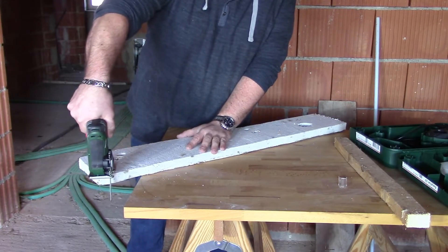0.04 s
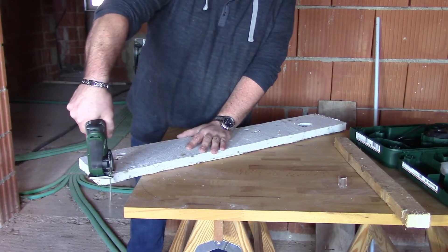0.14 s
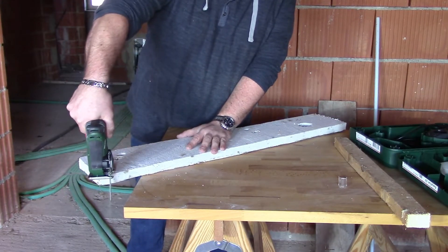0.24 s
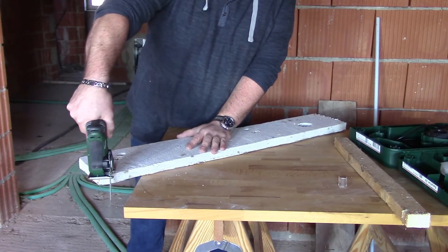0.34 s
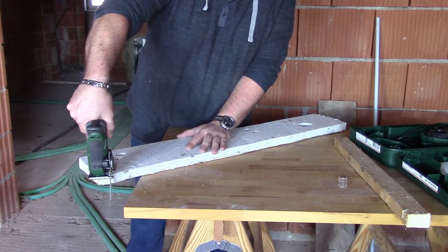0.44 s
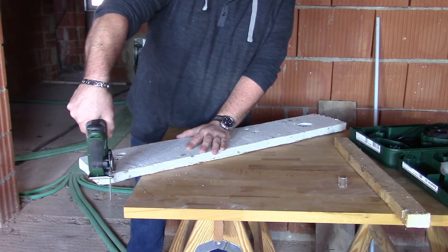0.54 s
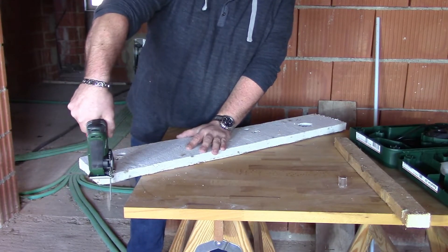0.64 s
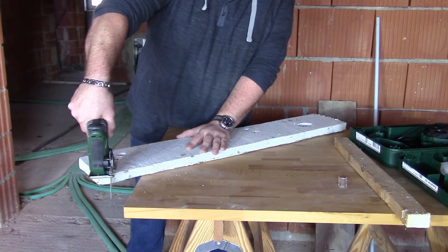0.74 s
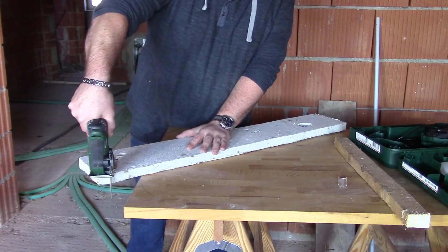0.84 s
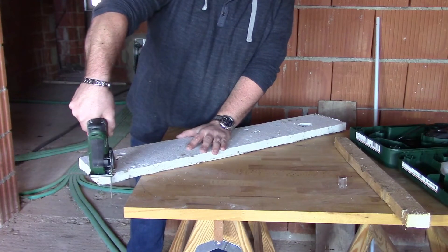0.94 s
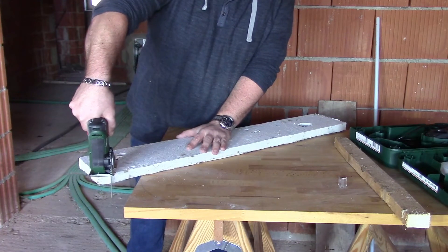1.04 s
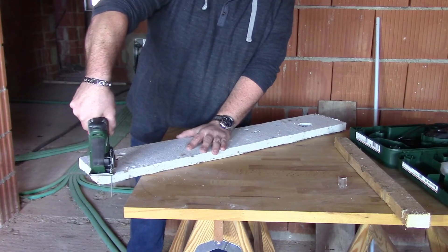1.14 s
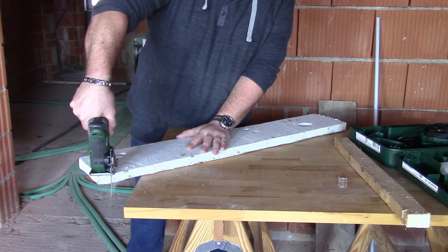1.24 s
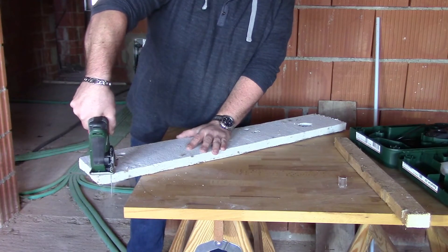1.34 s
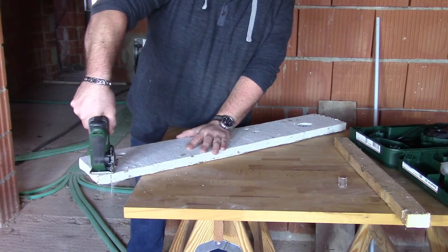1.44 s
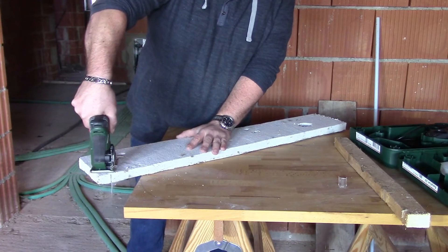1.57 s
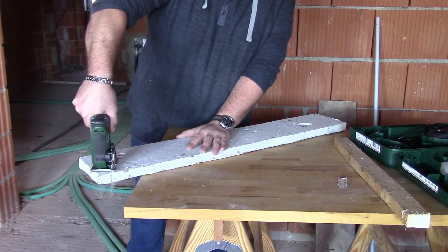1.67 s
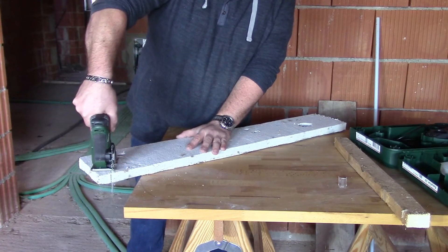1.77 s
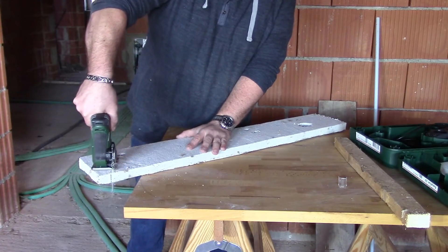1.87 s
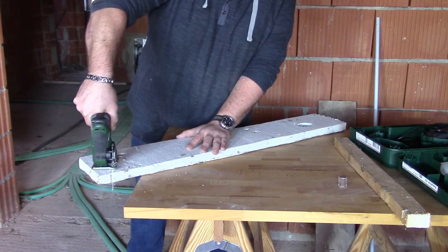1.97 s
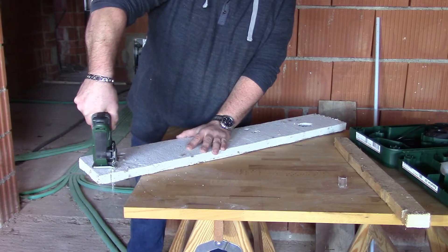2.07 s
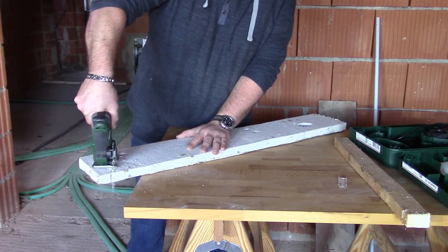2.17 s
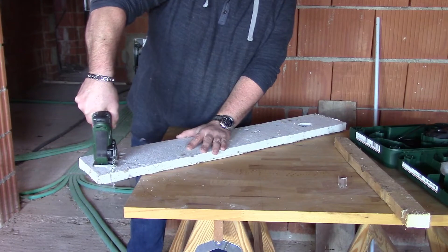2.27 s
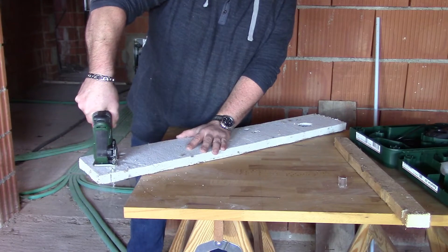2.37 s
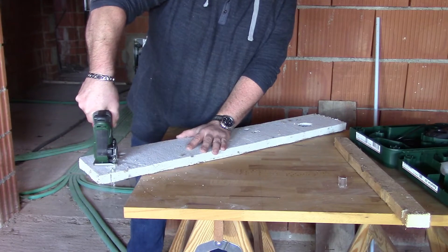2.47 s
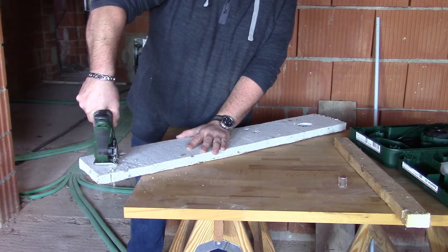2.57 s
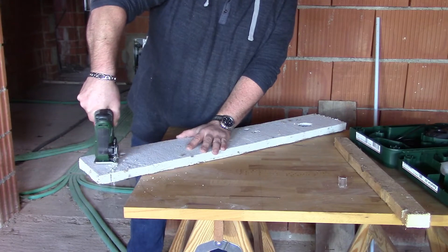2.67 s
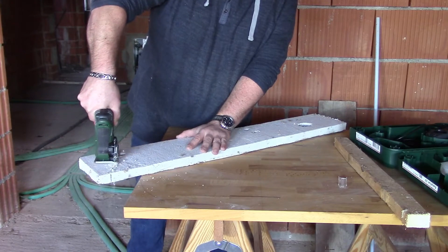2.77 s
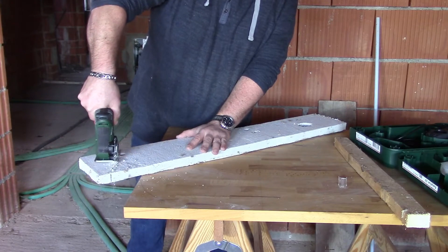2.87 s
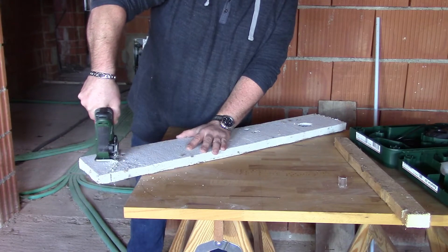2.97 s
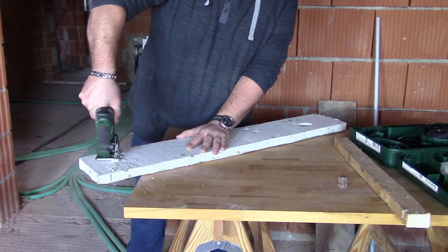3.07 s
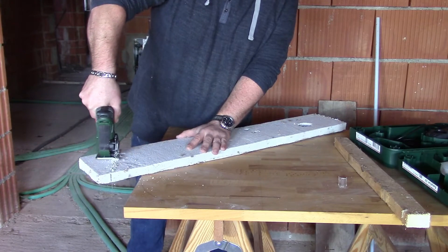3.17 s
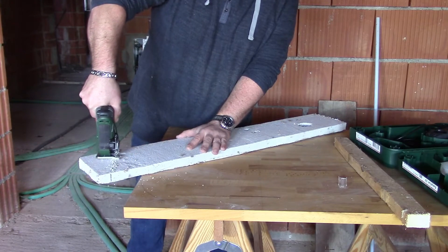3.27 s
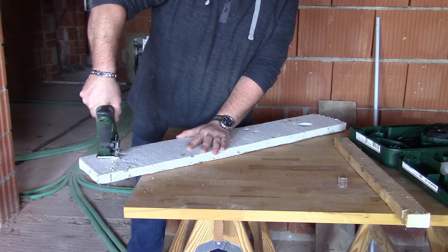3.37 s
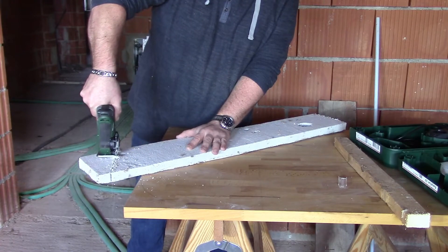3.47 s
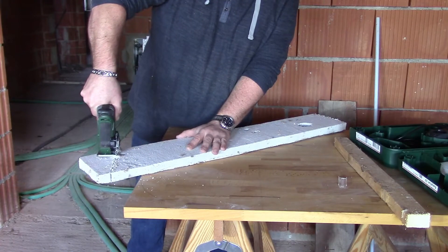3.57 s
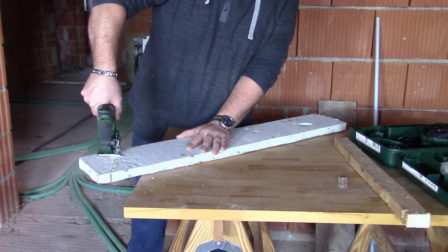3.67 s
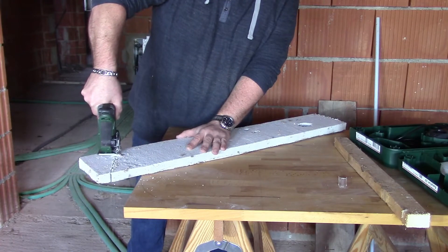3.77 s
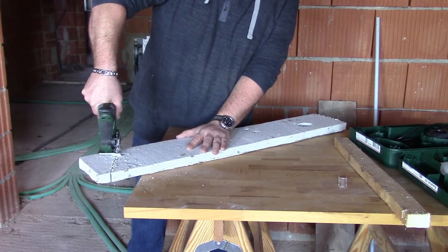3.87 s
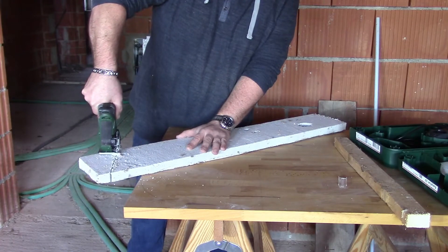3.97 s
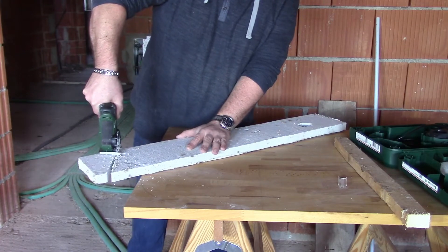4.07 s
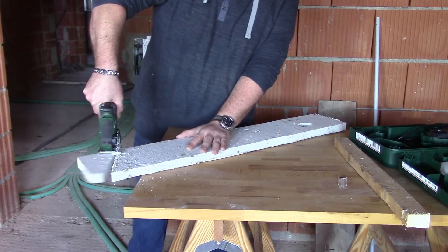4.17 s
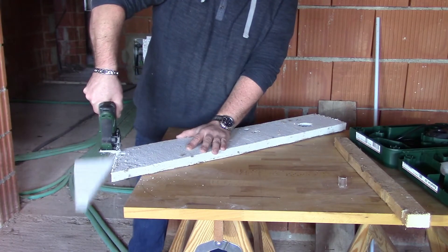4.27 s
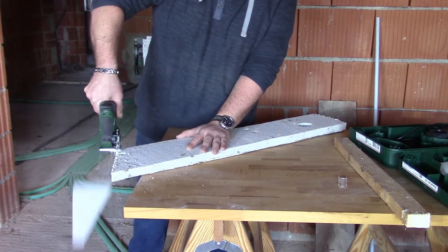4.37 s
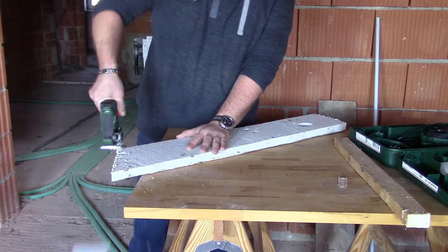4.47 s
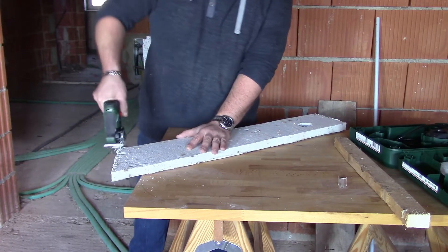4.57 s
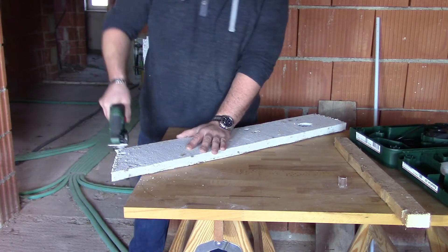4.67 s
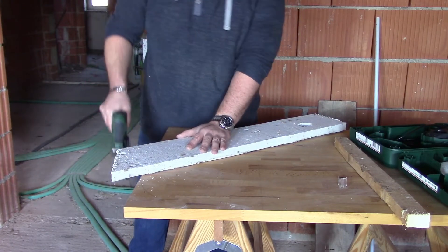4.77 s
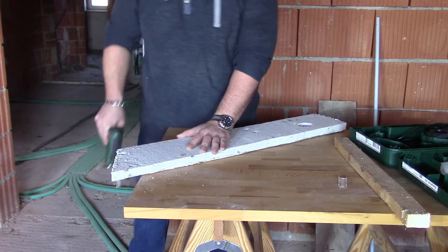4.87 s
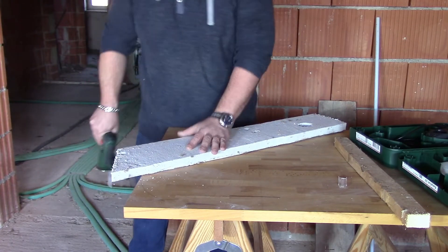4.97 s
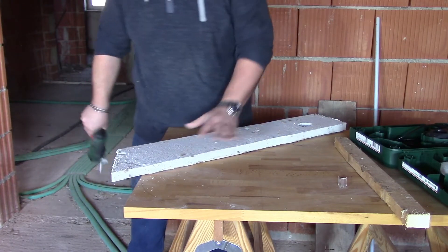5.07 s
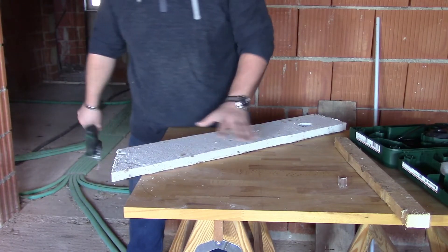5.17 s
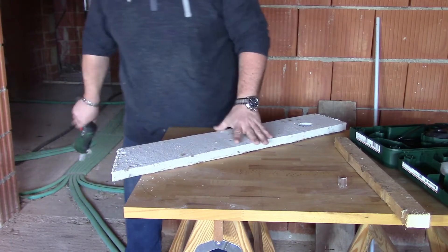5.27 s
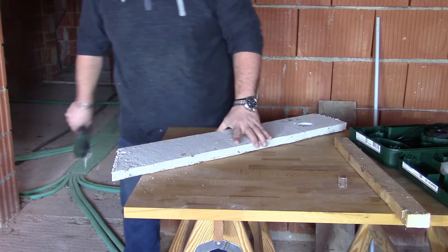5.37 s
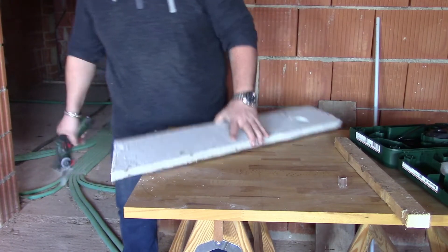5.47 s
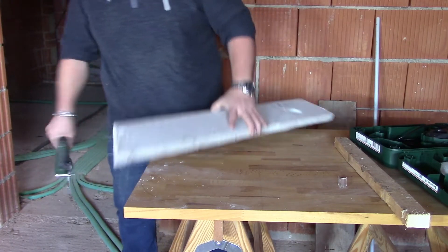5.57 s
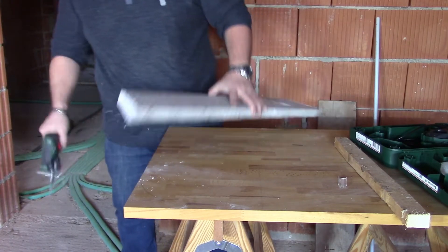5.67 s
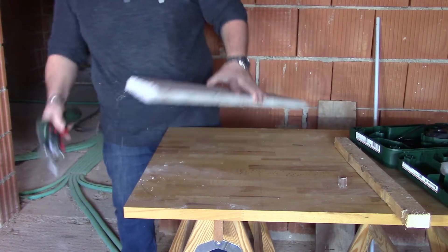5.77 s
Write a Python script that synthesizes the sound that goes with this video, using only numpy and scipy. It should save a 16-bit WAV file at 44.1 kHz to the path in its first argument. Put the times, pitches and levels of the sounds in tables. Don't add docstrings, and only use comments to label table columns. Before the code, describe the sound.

Harsh, buzzing chain saw cutting of light foam for about four seconds, then a quick stop, a hollow bouncing drop, short scuffs and dry clicks.

```python
import sys
import numpy as np
from scipy import signal
from scipy.fft import rfft, irfft
from scipy.io import wavfile
from scipy.ndimage import uniform_filter1d, minimum_filter1d

SR = 44100
rng = np.random.default_rng(int(sys.argv[2]) if len(sys.argv) > 2 else 0)


def magnitude_from_level(level_db):
    exponent = np.asarray(level_db, float) / 20
    return 10 ** exponent


def pcm_store(signal):
    levels = np.round(np.clip(np.atleast_2d(signal), -1, 1) * 32767)
    wavfile.write(sys.argv[1], SR, levels.astype(np.int16).T)


N = 256662
LEAD = SR // 4
STOP_S = 4.4


def evened(x):
    return x / np.sqrt(np.mean(x ** 2) + 1e-20)


def read(points, hz):
    f, value = np.transpose(points)
    return np.interp(np.log(hz + 1), np.log(f + 1), value)


def add(mix, s, sound):
    part = mix[round(s * SR):][:len(sound)]
    part += sound[:len(part)]


def after(t, s):
    return np.maximum(t - s, 0)


def columns(rows):
    s, *cols = np.transpose(rows)
    t = np.arange(-LEAD / SR, STOP_S, 1 / SR)
    return (t, *(np.interp(t, s, c) for c in cols))


def resonate(x, hz, width):
    turn = np.exp(2j * np.pi * np.cumsum(hz * np.ones(len(x))) / SR)
    r = np.exp(-np.pi * abs(width) / SR)
    return 2 * (turn * signal.lfilter([1 - r], [1, -r], x / turn)).real


def steady(x, size=5000):
    return x / np.sqrt(abs(uniform_filter1d(x ** 2, size=size)) + 1e-12)


def wander(size, hz):
    f = np.fft.rfftfreq(size, 1 / SR)
    gain = (f > 0) / (1 + (f / hz) ** 2)
    return evened(irfft(rfft(rng.standard_normal(size)) * gain, size))


def coloured(x, t, spectrum, tilt):
    hz, frame_s, z = signal.stft(x, SR, nperseg=512)
    slope = np.log2((hz[:, None] + 300) / 3000) * np.interp(frame_s + t[0], t, tilt)
    gain = magnitude_from_level(read(spectrum, hz)[:, None] + slope)
    gain /= np.sqrt((gain ** 2).mean(0))
    return signal.istft(z * gain, SR, nperseg=512)[1][:len(x)]


def grit(size, per_s, spread_db):
    hit = rng.random(size) < per_s / SR
    strength = magnitude_from_level(spread_db * np.minimum(rng.exponential(1, size), 4))
    return evened(hit * rng.standard_normal(size) * strength)


def ring(modes):
    t = np.arange(SR // 4) / SR
    return sum(magnitude_from_level(db - 60 * t / t60) * np.sin(2 * np.pi * hz * t) for hz, db, t60 in modes)


def crack(hz, width, t60):
    t = np.arange(2000) / SR
    burst = min(t60 / .016, 1) * rng.standard_normal(len(t)) * magnitude_from_level(-60 * t / t60)
    burst[0] = 1
    for _ in range(3):
        burst = resonate(burst, hz, width)
    soft_edges = signal.butter(3, (180, 11000), "band", fs=SR, output="sos")
    burst = signal.sosfilt(soft_edges, burst)
    return burst / abs(burst).max()


def awake(t, wake_s, sleep_s):
    glide_s = 0.064
    return (np.tanh((t - wake_s) / glide_s) - np.tanh((t - sleep_s) / glide_s)) / 2


def saw():
    # time in seconds, speed lost in Hz
    sag = [
        (.88, 0),
        (1.07, 5.5),
        (1.7, 8),
        (2.5, 5.5),
        (2.95, 8.5),
        (3.25, 5),
        (3.65, 7.5),
        (3.8, 5.5),
    ]
    # frequency in Hz, chain noise in dB per Hz
    rattle_spectrum = [(35, -68), (60, -44), (222, -60), (300, -43), (380, -12.5), (500, -14.5), (621, -5),
                       (750, -5), (903, -4.5), (1550, -11), (2140, -5.5), (3580, -12), (4420, -7.5),
                       (5460, -12.5), (6280, -9.5), (10800, -19.5), (16000, -48.5)]
    # frequency in Hz, width in Hz, level in dB
    housing = [(2100, 100, -2.5), (4090, 88, -7), (6840, 870, -30), (1311, 243, 7.5)]
    orders = [1, 2, 8, 9, 10, 12, 14, 16, 17, 18, 21, 24, 26]
    order_db = [-29, -31, -30.5, -45, -35, -26, -45, -27.5, -28.5, -35, -35, -33.5, -45]
    order_side = [0, 3, 1, 1, 2, 2, 2, 3, 3, 2, 2, 2, 3]
    # time in seconds, brush, fan and gear sides in dB
    facing = [(.15, 4, -4, 0), (.23, 12, 3, -2), (.33, 0, 1, -3), (.45, 5, 4.5, -6), (.65, 5, 4.5, -6),
              (1.0, 1, 4, 1), (1.5, -2, 1, 4), (2.0, -2, -3, 3), (2.3, -2, -1, 2), (2.7, 1, -1, -1),
              (3.2, 5, 1.5, -6), (3.6, 3, -2, -3), (4.2, 0, -1, -9)]
    start_hz, half_hz, free_hz = 262, 302, 388.8
    spin_up_s, full_trigger_s, trigger_off_s = .066, .203, 4.255
    coast_hz_per_s = 1100
    buried_s, brake_s = 1.035, 4.305
    level_db = -15

    t, sag_hz = columns(sag)
    shaft_hz = half_hz - (half_hz - start_hz) * np.exp(-after(t, 0) / spin_up_s) - sag_hz
    shaft_hz = shaft_hz + (free_hz - half_hz) * (1 - np.exp(-after(t, full_trigger_s) / spin_up_s))
    shaft_hz = uniform_filter1d(shaft_hz - coast_hz_per_s * after(t, trigger_off_s), size=1200)
    turns = np.cumsum(shaft_hz * (1 + .0004 * wander(len(t), 30))) / SR

    rattle_db = level_db + 5.5 * np.log2(shaft_hz / free_hz) - 380 * after(t, brake_s)
    rattle_db += -2 * np.minimum(10 * after(t, buried_s), 1)
    rattle_db += -0.21 * after(t, buried_s)
    tilt = 3 - 3 * np.clip(1 - t / 0.24, 0, 1) - 10 * after(t, trigger_off_s)

    links = grit(len(t), 9000, 3.76)
    links = links * (1 + 0.17 * np.cos(2 * np.pi * turns)) * magnitude_from_level(0.06 * wander(len(t), 27))
    links = coloured(links, t, rattle_spectrum, tilt)
    rattle = evened(links + sum(magnitude_from_level(db - 7.0) * resonate(links, hz, w) for hz, w, db in housing))
    slow = np.clip((free_hz - shaft_hz) / 40 - .6, 0, 1) * (t < trigger_off_s)
    slack = slow * magnitude_from_level(-10.5) * steady(resonate(resonate(links, 2220, 340), 2220, 340))

    shaft_db = -9 * np.clip(10 * (.6 - t), 0, 1)
    side_db = (shaft_db, *columns(facing)[1:])
    whine = np.zeros(len(t))
    for multiple, db, side in zip(orders, order_db, order_side):
        strength = magnitude_from_level(db + side_db[side] + 1.2 * wander(len(t), 8))
        whine += strength * np.cos(2 * np.pi * (multiple * turns + rng.random()))
    pull_db = uniform_filter1d(-8 * (t < full_trigger_s), size=2000)
    whine = magnitude_from_level(rattle_db - level_db + 4.5 + pull_db) * whine
    return magnitude_from_level(rattle_db + 1.78) * (rattle + slack), whine


def board():
    # time in seconds, bite in dB, overhang pitch in Hz
    cut = [(0, -19, 637), (.3, -15, 690), (.6, -14.5, 664), (1.0, -10, 712), (1.3, -12, 762),
           (1.6, -14, 797), (1.9, -16.5, 873), (2.2, -13, 956), (2.5, -17, 930), (2.9, -20, 910),
           (3.3, -10.5, 764), (3.8, -18, 786), (4.15, -25, 730)]
    # time in seconds, gain in dB
    snags = [
        (.25, 6.5),
        (.87, 7.5),
        (1.35, 4.5),
        (1.6, 2),
        (1.945, 7),
        (2.08, 2),
        (2.46, 3),
        (3.029, 6),
    ]
    # frequency in Hz, width in Hz, level in dB, the two times in
    # seconds between which it is awake, in either order
    board_modes = [(589.4, 7, -26.5, -0.04, 0.86), (667, 7.3, -26, -0.3, 0.53), (690, 4.8, -23, 1.34, 1.7),
                   (690, 4.1, -32.5, 0.5, 1.97), (760, 8, -29, 2.2, 2.35), (760, 9.5, -25, 0.9, 0.37),
                   (795, 6.2, -33, 0.6, 1.9), (805, 10, -29.5, 3.0, 4.3), (890.3, 7, -22, 1.6, 3.16),
                   (895, 7.9, -23.5, 1, 2.05), (959, 9, -24, 1.5, 3.24), (1066, 3, -26, 2, 2.5),
                   (742, 12, -19, 4, 3.43), (520, 9.3, -32, 2, 4.2), (604, 6.4, -34.5, 3.5, 4.3),
                   (1240, 9.2, -33, 0.7, 1.4), (970, 8.6, -29.5, -1.2, 0.91), (690, 12, -28.5, 0.2, 0.71),
                   (595, 5.7, -29.5, 0.9, 1.6), (469, 5.7, -33, 2, 3.18)]
    snag_s, enter_s = 0.036, 0.45
    parted_s, part_fade_s, left_shaking = 4.21, 0.0038, 0.3

    t, bite_db, ring_hz = columns(cut)
    snag_db = sum(db * np.exp(-((t - s) / snag_s) ** 2) for s, db in snags)
    entering = np.exp(-after(t, 0) / enter_s)
    ring_db = bite_db + snag_db + 2 * wander(len(t), 1.8)
    flex_db = -24 + 4.5 * np.clip(t / 0.73, 0, 1) - 35 * entering + 0.61 * snag_db
    hum_db = -53.5 - 2 * entering - 0.5 * wander(len(t), 2.4)

    teeth = grit(len(t), 1500, 2.35)
    overhang = steady(resonate(resonate(teeth, ring_hz, 180), ring_hz, 180))
    modes = np.zeros(len(t))
    for hz, width, db, wake_s, sleep_s in board_modes:
        strength = magnitude_from_level(db + 3 * wander(len(t), 12)) * awake(t, wake_s, sleep_s)
        modes += strength * steady(resonate(teeth, hz, width), size=2000)
    knell = magnitude_from_level(-25 - 4.1 * ((t - .6) / .3) ** 2) * steady(resonate(teeth, 464, 3.2))
    flex_hz = 401 + 58 * after(t, 3.37)
    flex = steady(resonate(resonate(teeth, flex_hz, 193), flex_hz, 193))
    hum = evened(resonate(resonate(teeth, 134.5, 21), 134.5, 21))

    shaken = magnitude_from_level(ring_db - 15.5) * overhang + magnitude_from_level(flex_db - 7.5) * flex + magnitude_from_level(hum_db + 3.0) * hum
    held = left_shaking + (1 - left_shaking) * np.exp(-after(t, parted_s) / part_fade_s)
    return shaken * held, (magnitude_from_level(0.96 * snag_db + 0.5) * modes + knell) * held


def offcut():
    # time in seconds, face ring, edge ring and tick in dB
    bounces = [(4.6283, 2, -19, -4.5), (4.6365, 3.5, -40, -30), (4.6491, -5, 2, -32), (4.678, -3, -26, -36),
               (4.692, -14, -7.5, -42), (4.711, -6.5, -20, -45), (4.742, -12, -24, -22),
               (4.797, -16, -51, -25), (4.822, -8, -34, -46), (4.851, -25, -40, -20),
               (4.876, -21, -44, -52), (4.892, -19, -46, -25), (4.916, -19, -29, -16.5),
               (4.962, -27, -44, -50), (5.003, -34, -44, -33)]
    # frequency in Hz, level in dB, 60 dB decay in seconds
    face_modes = [(690, 2.5, 0.25), (561, 0.5, 0.025), (337, -8, 0.038), (1186, -11.5, 0.051),
                  (1580, -8, 0.075)]
    edge_modes = [(1200, -12.5, 0.1), (1608, -9.5, 0.082), (1800, 2, 0.015), (2050, 2, 0.013),
                  (2205, -9, 0.038), (2670, -18, 0.03), (3280, -35, 0.0065), (4610, -19, 0.023)]
    squash_s, choke_s, tick_late_s = 0.00051, 0.0029, 0.0017

    out, t = np.zeros((2, N)), np.arange(SR // 4) / SR
    flights = np.diff([row[0] for row in bounces], append=6)
    for (s, face_db, edge_db, tick_db), flight_s in zip(bounces, flights):
        free = np.minimum(t / squash_s, 1) * np.exp(-after(t, flight_s - choke_s) / choke_s)
        add(out[0], s, magnitude_from_level(face_db - 7.0) * free * ring(face_modes))
        add(out[1], s, magnitude_from_level(edge_db - 0.5) * np.minimum(4 * t / squash_s, 1) * ring(edge_modes))
        add(out[1], s + tick_late_s, magnitude_from_level(tick_db - 1) * crack(6100, 21000, 0.021))
    no_bass = signal.butter(2, 260, "high", fs=SR, output="sos")
    return signal.sosfilt(no_bass, out)


def drags():
    # start in seconds, push in seconds, level in dB, fall in dB a second, brightness in dB an octave
    pushes = [
        (5.002, 0.006, -32.5, 300, -3),
        (5.234, 0.045, -27.5, 362, 4.5),
        (5.388, 0.028, -24, 600, 4.5),
    ]
    # frequency in Hz, friction noise in dB per Hz
    rub_spectrum = [(88, -40.5), (150, 3), (388, -1), (509, -2), (827, -1), (1320, -9), (1630, -3),
                    (2410, -9), (2980, -10.5), (9730, -15), (15500, -40)]
    # frequency in Hz, width in Hz, level in dB
    rub_rings = [(408, 100, 1), (880, 40, -1), (1680, 500, -12), (2400, 750, -5)]
    slide_s, dull_db_per_s = .13, -60

    out, t = np.zeros(N), np.arange(SR // 5) / SR
    for s, push_s, db, fall_db, bright_db in pushes:
        rub = coloured(grit(len(t), 9000, 0.46), t, rub_spectrum, bright_db + dull_db_per_s * t)
        rub = rub + sum(magnitude_from_level(g - 5.0) * resonate(rub, hz, w) for hz, w, g in rub_rings)
        push = np.minimum(t / push_s, 1) ** 0.58 * magnitude_from_level(db - fall_db * after(t, push_s))
        add(out, s, push * evened(rub) * np.clip((slide_s - t) / .02, 0, 1))
    return out


def clicks():
    # time in seconds, level in dB, centre in Hz, width in Hz, 60 dB decay in seconds
    snaps = [(4.186, -12.5, 2770, 600, 0.009), (4.195, -18.5, 330, 139, 0.022),
             (4.32, -13.5, 2160, 900, 0.0096), (4.574, -40, 8600, 6960, 0.051),
             (4.6305, -17, 6020, 900, .012), (4.631, -23, 9300, 1200, .012), (4.651, -24, 4700, 900, 0.015),
             (4.6492, -32, 6500, 5930, 0.008), (4.6493, 3, 1860, 1510, 0.006),
             (4.677, -27, 10200, 2500, .015), (4.837, -34, 8000, 5000, .008),
             (4.917, -36, 4670, 2500, .015), (4.988, -44, 9500, 2000, .006), (5.15, -42, 3500, 4000, .004),
             (5.201, -46, 8040, 2520, .003), (5.393, -35, 10100, 1500, .03),
             (5.413, -18.5, 2610, 4570, 0.033), (5.417, -18, 1990, 3020, 0.027),
             (5.413, -20, 8000, 6000, 0.0064), (5.6114, -22, 4500, 7040, 0.009),
             (5.614, -30, 5500, 4000, .012), (5.6173, -28, 3400, 4960, 0.069),
             (5.685, -35, 7360, 3000, .003), (5.685, -34, 2500, 2500, 0.0035),
             (5.742, -22, 4800, 8000, 0.0058), (5.7427, -25.5, 3200, 4000, .008),
             (5.7455, -33, 4470, 4000, .008), (5.749, -36, 5460, 8000, .02),
             (5.7565, -40, 7000, 8000, .006), (5.278, -23, 1800, 2500, 0.022),
             (5.267, -38, 11000, 2000, .02)]
    out = np.zeros(N)
    for s, db, hz, width, t60 in snaps:
        add(out, s, magnitude_from_level(db + 6.0) * crack(hz, width, t60))
    return out


def thumps():
    # time in seconds, level in dB
    shifts = [
        (5.001, -32),
        (5.276, -28),
    ]
    out, t = np.zeros(N), np.arange(SR // 3) / SR
    for s, db in shifts:
        swell = np.minimum(t / 0.034, 1)
        add(out, s, magnitude_from_level(db + 7.5 - 60 * t / 0.48) * swell * np.sin(2 * np.pi * 132 * t))
    return out


def echoes():
    # frequency in Hz, 60 dB decay in seconds
    tail_t60 = [(130, 0.17), (500, 0.45), (1400, 0.62), (3700, 0.4), (9700, 0.3), (16000, 0.33)]
    # frequency in Hz, level in dB
    walls = [(100, 0), (1500, 0), (4000, -2), (8000, -5), (16000, -9)]
    # frequency in Hz, side level against mid in dB
    side_tail = [(60, -13), (200, -24), (700, -31), (1300, -22), (2400, -19), (4400, -12.5), (8100, -14),
                 (12000, -7), (15000, -32)]

    taps = np.zeros((2, SR))
    slots = np.arange(100, SR - 20, 20)
    at = slots + rng.integers(0, 20, (2, len(slots)))
    np.put_along_axis(taps, at, rng.choice([-1., 1.], at.shape), 1)
    hz, t, z = signal.stft(taps, SR, nperseg=256)
    z *= magnitude_from_level(-60 * t / read(tail_t60, hz)[:, None]) * (1 + 1.1 * magnitude_from_level(-60 * t / 0.035))
    z /= np.sqrt((abs(z) ** 2).sum(2, keepdims=True))
    z *= magnitude_from_level(read(walls, hz))[:, None]
    z[1] *= magnitude_from_level(read(side_tail, hz))[:, None]
    tail = signal.istft(z, SR, nperseg=256)[1]
    return tail / np.linalg.norm(tail[0])


def room(x):
    sway = 2 * np.pi * 1.3 * np.arange(len(x)) / SR
    return sum(signal.fftconvolve((x * w)[None], echoes(), axes=1)[:, LEAD:LEAD + N]
               for w in (np.cos(sway), np.sin(sway)))


def air():
    # frequency in Hz, level in dB per Hz
    hiss = [(18, -55), (30, -28), (117, 8.5), (606, -5.5), (691, -3), (1110, -5), (2360, -10.5),
            (8500, -20), (15500, -38)]
    hz = np.fft.rfftfreq(N, 1 / SR)
    noise = irfft(rfft(rng.standard_normal((2, N))) * magnitude_from_level(read(hiss, hz)), N)
    return magnitude_from_level(-47) * evened(noise) * magnitude_from_level([[0], [-14]])


def scene():
    # frequency in Hz, width in Hz, level in dB
    bench = [(464, 16, 2), (520, 18, 5), (598, 18, 4), (690, 20, 6), (800, 22, 5), (893, 18, 5),
             (962, 18, 5), (1066, 18, 2), (1236, 20, 4), (1359, 20, 2)]
    # frequency in Hz, left over right in dB
    lean_db = [(30, -.3), (60, -6.5), (250, -1.5), (1000, -1.23), (4000, -0.5), (8000, -0.3), (15000, 6.5)]

    cutting, whine = np.zeros((2, LEAD + N))
    rattle, orders = saw()
    shaken, modes = board()
    add(cutting, 0, rattle)
    add(cutting, 0, shaken)
    cutting = cutting + sum((magnitude_from_level(db) - 1) * resonate(cutting, hz, w) for hz, w, db in bench)
    add(whine, 0, orders)
    add(whine, 0, modes)
    face, edge = offcut()
    face = np.pad(face, (LEAD, 0))
    hits = np.pad(edge + drags() + clicks(), (LEAD, 0))

    to_room = cutting + magnitude_from_level(-2.5) * hits + magnitude_from_level(-15) * face + whine / 5
    mid, side = magnitude_from_level(0.5) * room(to_room) + air()
    direct = (magnitude_from_level(-1.0) * cutting + hits + face + whine)[LEAD:]
    mid = mid + direct + thumps()
    lean = np.tanh(read(lean_db, np.fft.rfftfreq(N, 1 / SR)) * np.log(10) / 40)
    side = side + irfft(rfft(mid) * lean, N)
    return np.array([mid + side, mid - side])


def low_pass(x):
    return signal.sosfilt(signal.butter(12, 16540, fs=SR, output="sos"), x)


def record(dry):
    # frequency in Hz, microphone response in dB
    mic = [(20, -1), (60, -35), (100, -11.5), (220, -7), (400, -3.5), (12000, -4.5), (15800, 6.5)]
    hz = np.fft.rfftfreq(1024, 1 / SR)
    taps = signal.firwin2(1025, hz / hz[-1], magnitude_from_level(read(mic, hz)) * (hz < 15820))
    heard = signal.oaconvolve(dry, taps[None], "same", axes=1)
    headroom = np.minimum(.97 / (abs(heard).max(0) + 1e-9), 1)
    headroom = minimum_filter1d(headroom, size=201)
    heard = heard * uniform_filter1d(headroom, size=201)
    return low_pass(heard)


dry = scene()
out = record(dry)
pcm_store(out)
```